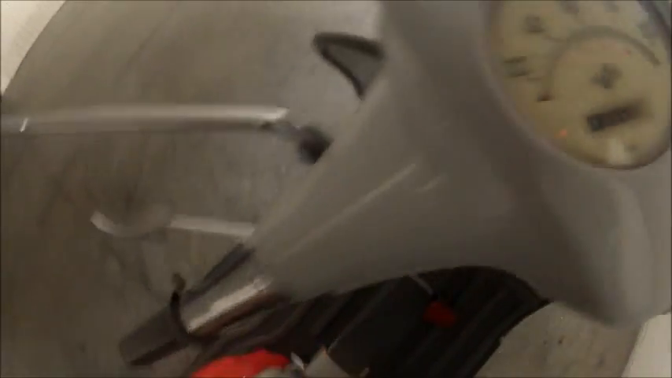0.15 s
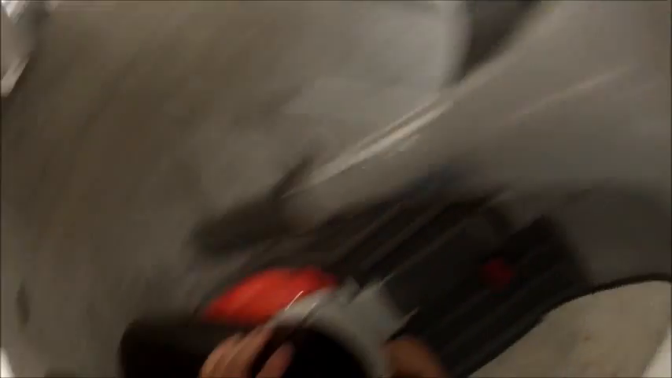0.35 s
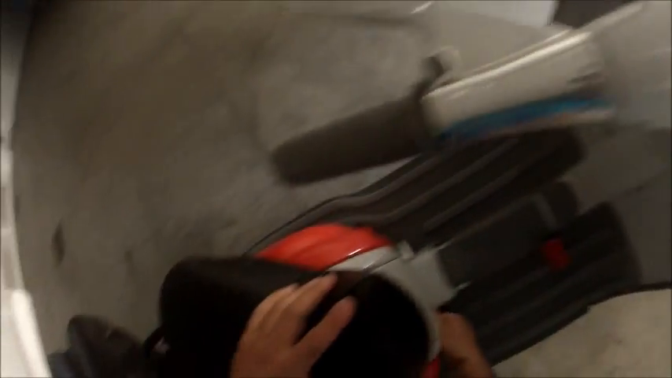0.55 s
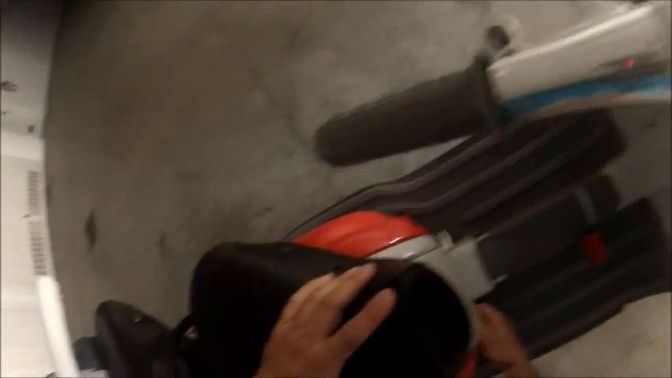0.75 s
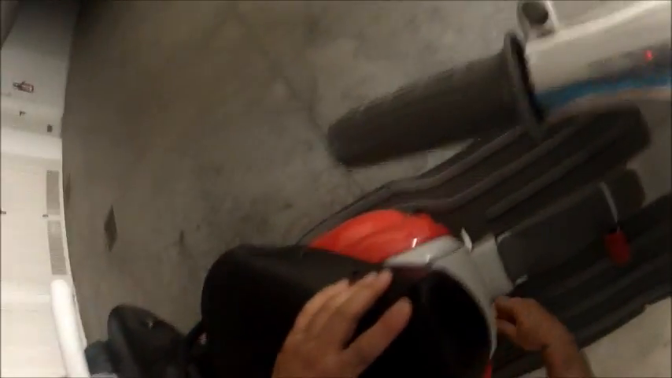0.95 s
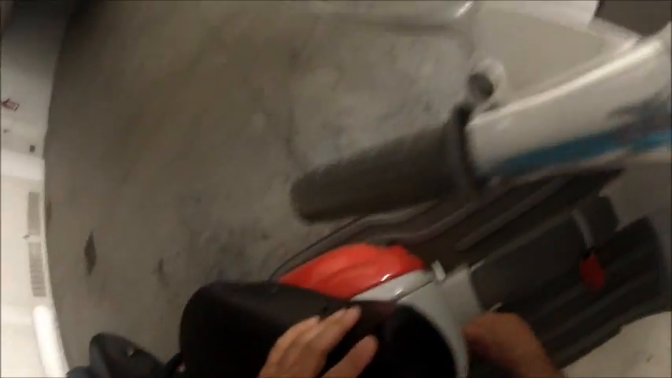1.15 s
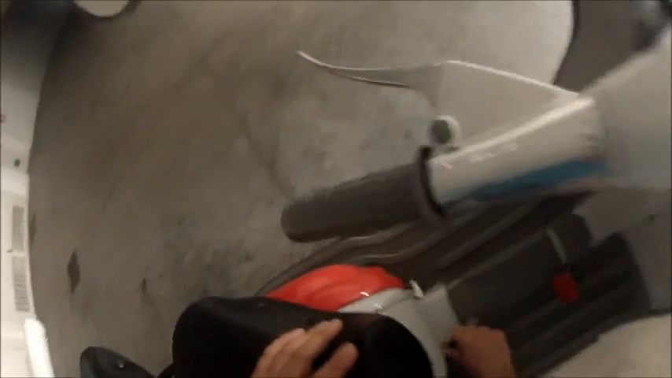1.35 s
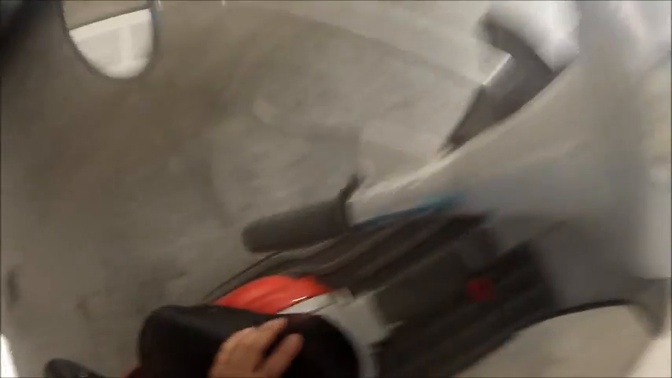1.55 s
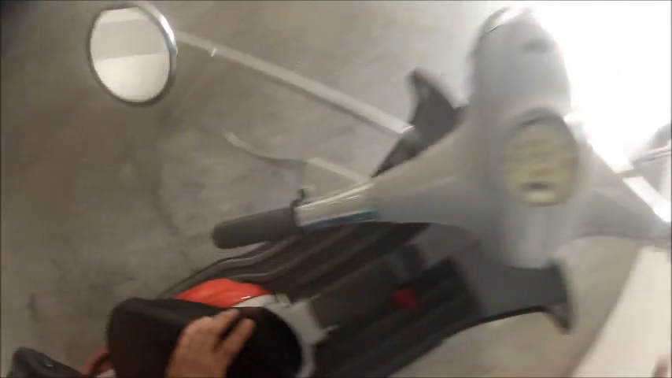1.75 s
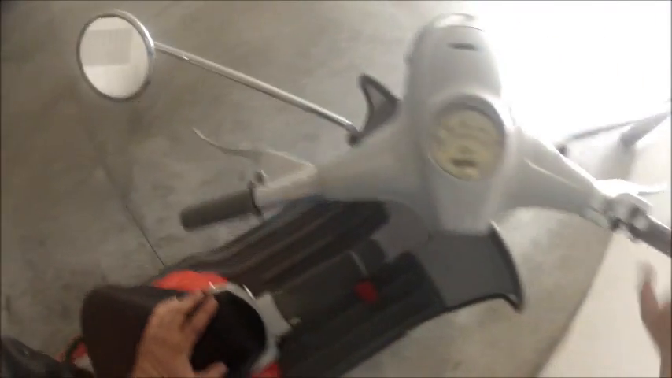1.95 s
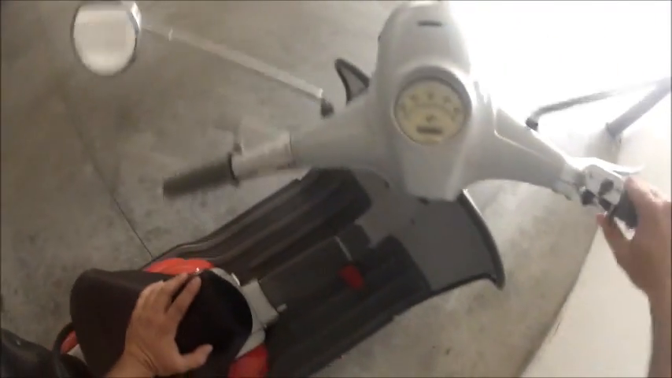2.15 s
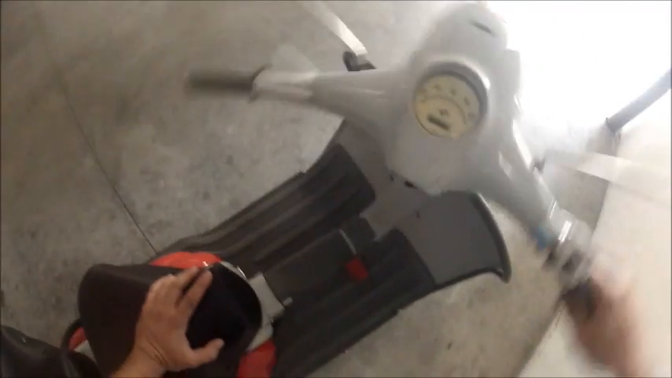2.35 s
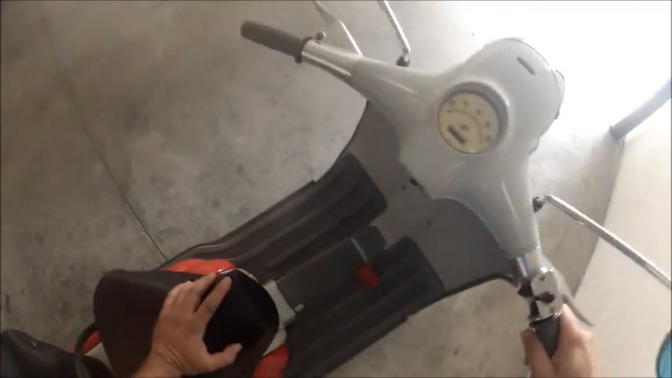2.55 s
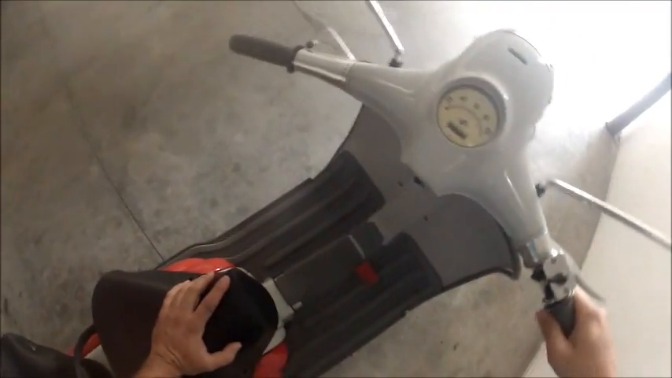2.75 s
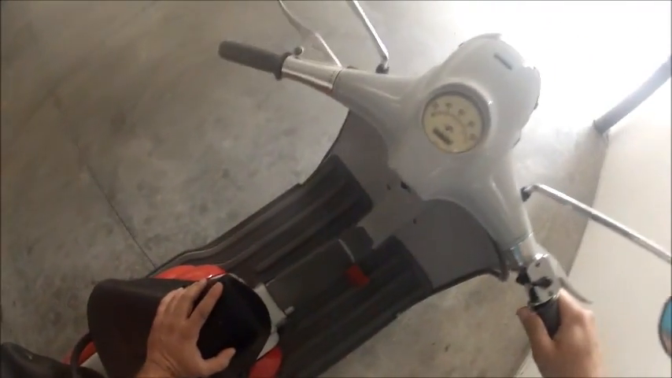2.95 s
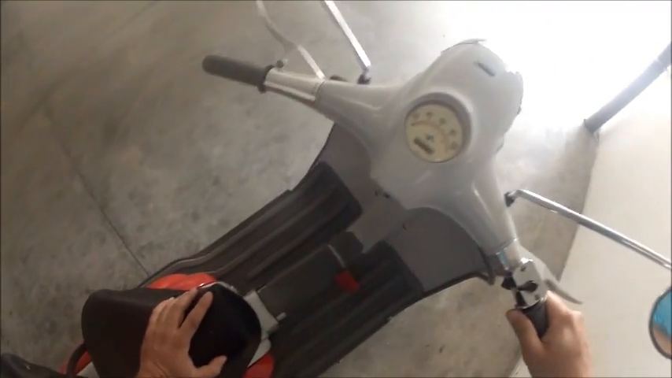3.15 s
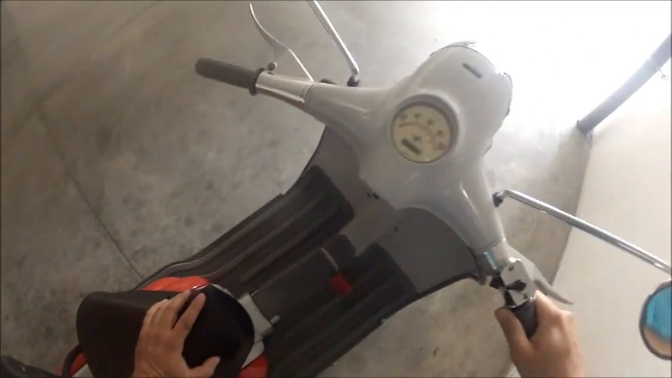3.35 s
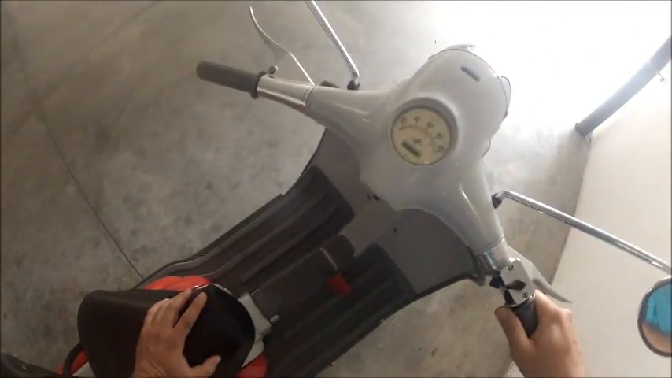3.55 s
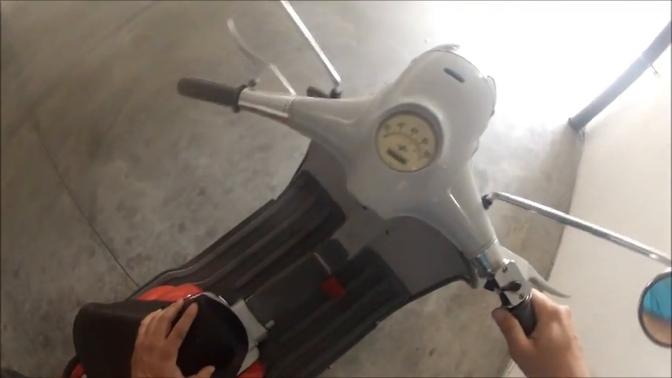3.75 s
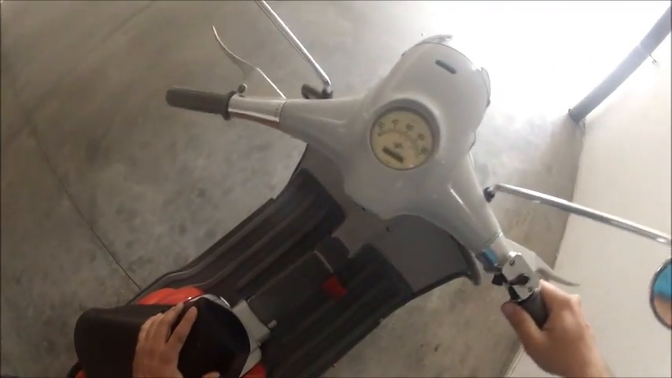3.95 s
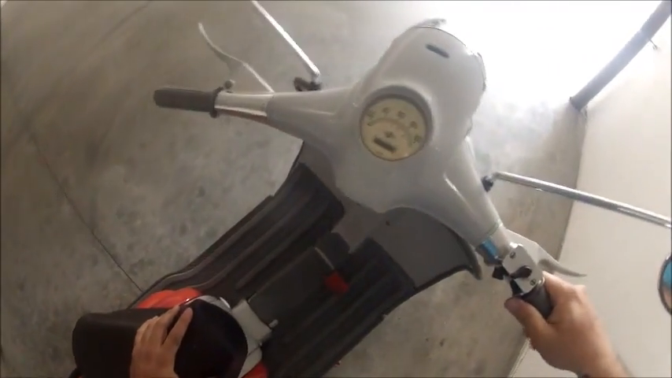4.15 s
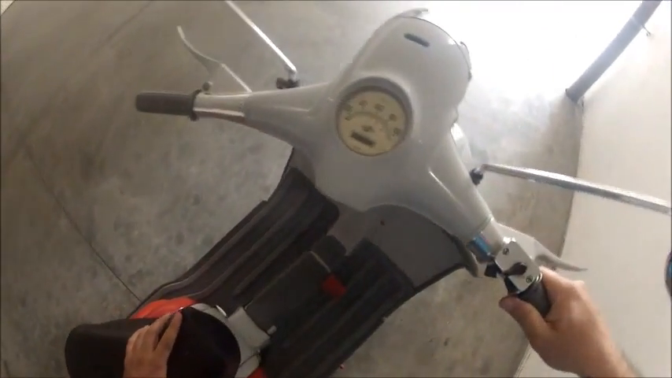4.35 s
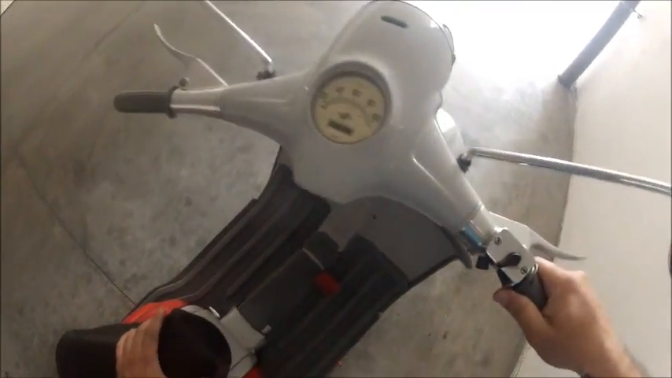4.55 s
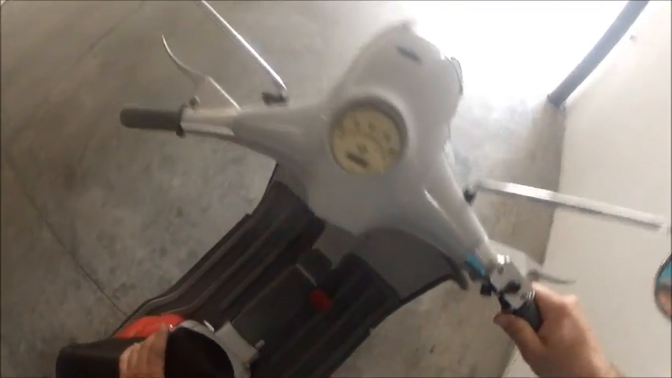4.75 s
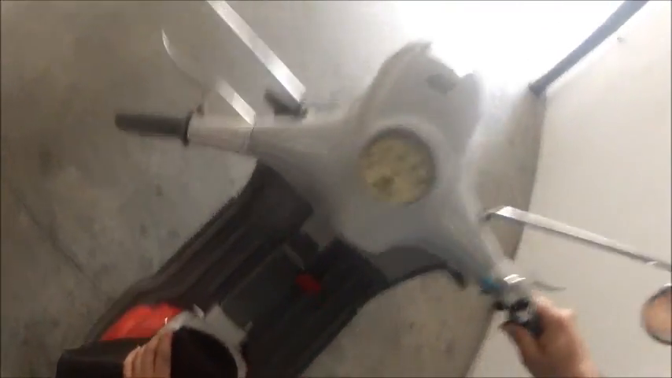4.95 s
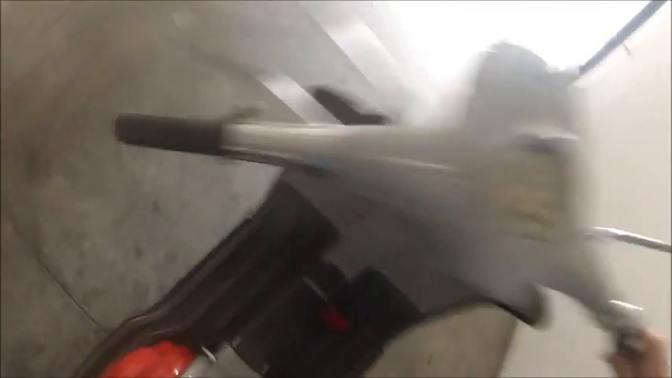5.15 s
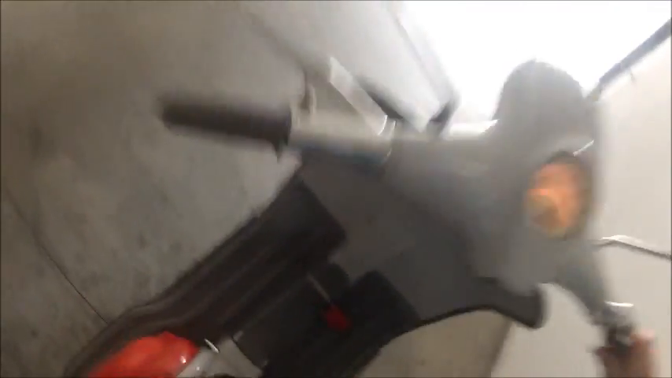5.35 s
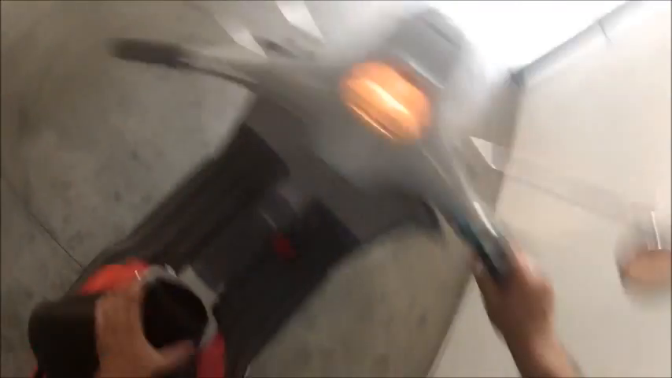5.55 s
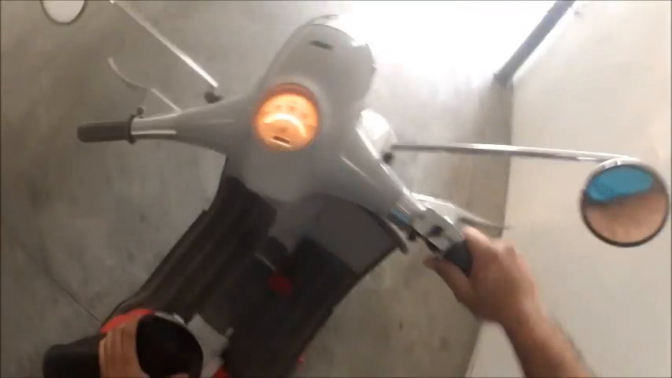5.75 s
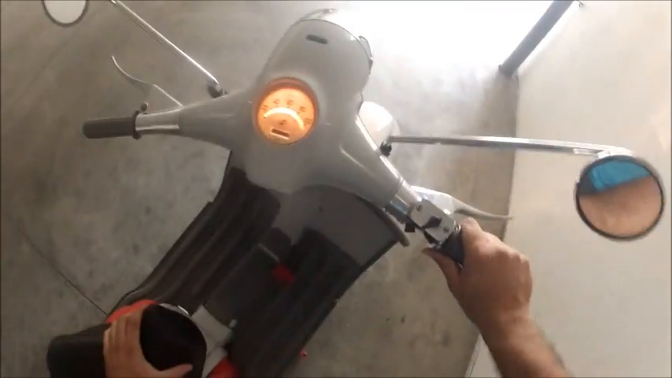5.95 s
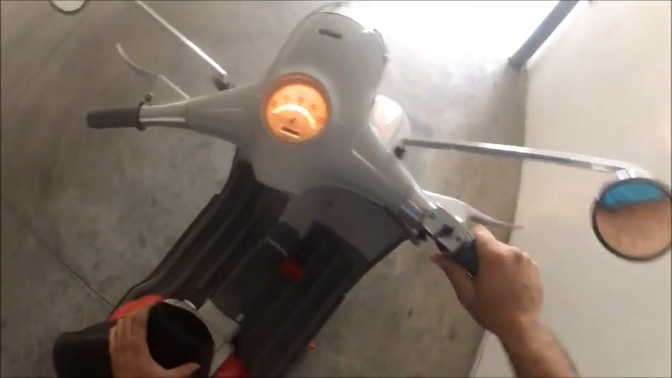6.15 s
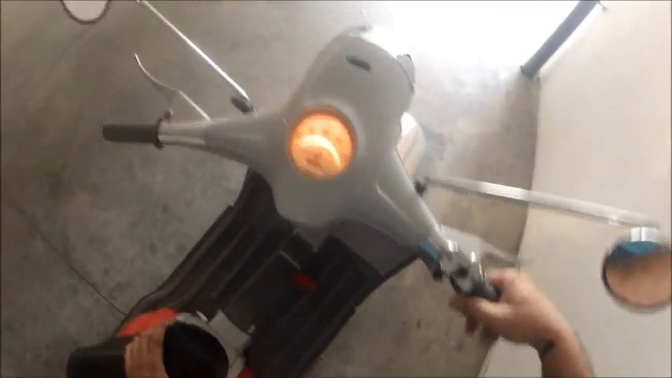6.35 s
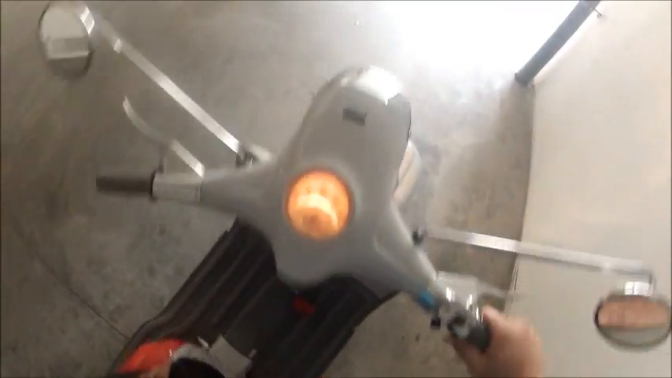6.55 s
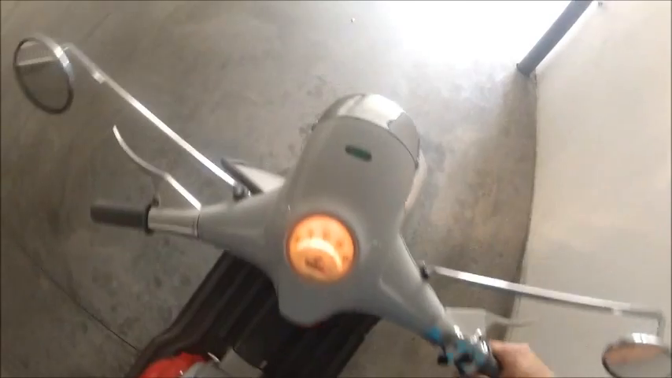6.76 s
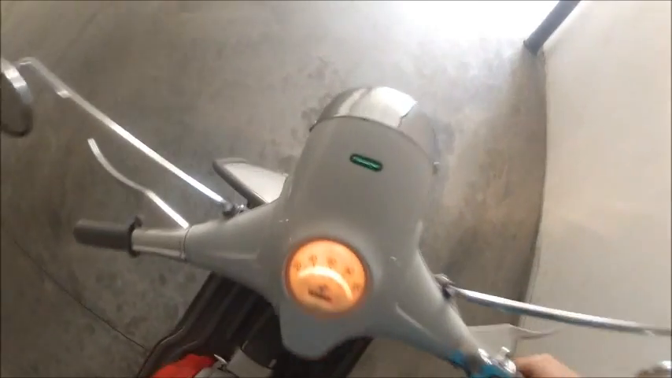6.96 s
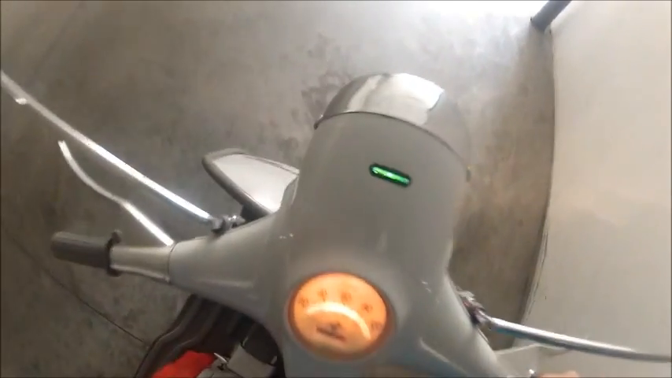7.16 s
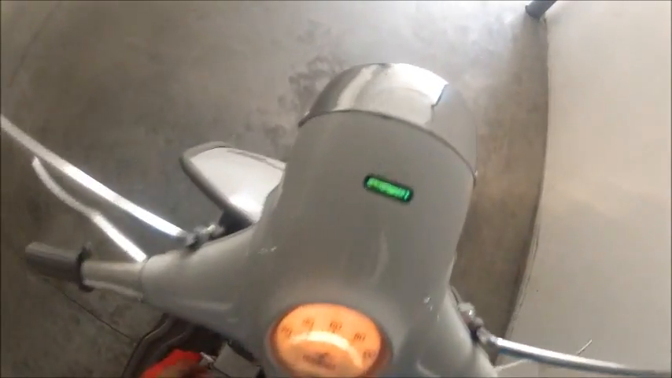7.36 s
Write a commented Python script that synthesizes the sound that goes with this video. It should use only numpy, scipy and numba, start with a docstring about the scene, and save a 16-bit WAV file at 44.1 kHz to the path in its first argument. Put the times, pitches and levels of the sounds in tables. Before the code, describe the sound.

A quiet concrete garage is heard from a helmet-mounted microphone, with faint room tone and a low rumble of head movement. Tiny plastic ticks and soft cloth rustle fill the first second. A scooter's levers knock lightly at about 0.3, 1.3, 1.8, 2.6 and 3.5 seconds, some with a brief metallic ring. A very faint, thin squeak follows near 4.4 seconds. From 5 to 5.7 seconds, sharp, dry plastic clicks clatter right at the microphone, loudest around 5.3, joined by rustling and low thumps. At 5.5 seconds a kick-start ratchet rasps briefly and the small engine catches. It runs at a wavering speed with a whirring fan, low hum and booming exhaust. Irregular firing cracks echo off the walls from 5.8 to 6.7 seconds, with another at 7.1. The engine speeds up slightly near 6.9 and is still running at the end, around 7.4 seconds.

```python
"""First a low rumble and small ticks, right at the microphone: a helmet camera in a plastic housing,
moving with the head in a quiet concrete garage. Close by, cloth rustles and a scooter's levers knock.
After five seconds it is kicked into life: a ratchet rasps, the fan whirrs, the exhaust booms in the
room and uneven firings crack off the walls. The camera samples at a low rate and holds each value,
which mirrors the sound into the treble."""
import sys
import numpy as np
from scipy import signal
from scipy.io import wavfile
from scipy.ndimage import uniform_filter1d
from numba import njit

SR = 44100
rng = np.random.default_rng(int(sys.argv[2]) if len(sys.argv) > 2 else 0)


def int16_out(signal):
    """Quantize to a 16-bit WAV file."""
    q = np.round(np.clip(np.atleast_2d(signal).T, -1, 1) * 32767)
    wavfile.write(sys.argv[1], SR, q.astype(np.int16))


N = 326781
T = np.arange(N) / SR

# head movement reaching the microphone (time [s], sway [dB], thud [dB])
HEAD_MOTION = [(0, -58, -68), (.52, -52, -62), (.84, -61.5, -72.5), (1.19, -58, -74.5), (1.63, -64.5, -70),
               (2.15, -57, -69.5), (2.56, -51.5, -69), (3.2, -63.5, -76), (3.6, -58.5, -74.5),
               (4.66, -52, -70.5), (5.24, -42, -51.5), (5.61, -43.5, -42), (5.88, -62, -56),
               (6.2, -45.5, -70), (6.5, -58, -59), (7.41, -53, -61)]
# bumps of the mount (time [s], sway [dB], thud [dB], decay [s])
MOUNT_BUMPS = [(.36, -51, -35.5, 0.012), (.43, -44, -49, 0.056), (0.871, -57, -42, 0.025),
               (1.31, -54, -65, .04), (1.46, -46, -59, 0.04), (1.539, -41, -70, 0.047),
               (1.79, -55, -65, 0.038), (1.94, -48, -85, 0.021), (2.07, -51, -64, 0.027),
               (2.4, -55, -74, 0.07), (2.89, -60, -62.5, 0.018), (4.19, -54.5, -70.5, 0.075),
               (4.42, -53, -60, 0.036), (4.58, -60, -82, 0.018), (4.75, -45, -63, 0.033),
               (4.98, -55, -46, 0.046), (5.14, -51, -40, 0.017), (5.279, -60, -37, 0.039),
               (5.499, -27.5, -38, 0.025), (5.68, -21.5, -33, .03), (5.73, -33, -45, 0.034)]
# room tone of the garage (frequency [Hz], relative band level [dB])
ROOM_BANDS = [(100, -16), (200, -11), (400, -17), (800, -31), (1400, -29.5), (2000, -26), (2700, -35),
              (4500, -33), (6000, -40)]
# cloth next to the housing (time [s], level [dB])
CLOTH_LEVELS = [(0.0, -81), (0.6, -74.5), (1.0, -86.5), (1.33, -81), (1.5, -74.5), (2.74, -78.5),
                (3.3, -87), (4.38, -71.5), (4.9, -82.5), (5.35, -61), (5.5, -41.5)]
# levers, stand and shoes; bands and ring are relative to the mid band, echo send to the peak
# (time [s], peak [dB], low band [dB], high band [dB], pitch [Hz], length [s], ring [dB], echo send [dB])
LEVER_KNOCKS = [(0.347, -51, -17, -20, 1190, 0.024, -30, -16.5),
                (1.282, -44.5, 1.5, -19, 846, 0.015, -15, -21),
                (1.816, -45.5, -39, -4.5, 1360, 0.048, -5.5, -24),
                (2.606, -51, 1, -10.5, 900, 0.021, -19, -12), (2.62, -49, 1, -20, 635, 0.013, -15, -13.5),
                (2.7, -49, -7, -15, 1210, 0.025, -16, -16), (3.52, -41, -4.5, -5.5, 663, 0.026, -0.5, -17),
                (3.7, -49.5, -5, -14, 954, 0.037, -8, -16.5), (5.057, -51, -6, -23, 1200, 0.029, -28, -23),
                (5.185, -53, 2, -19, 1280, 0.025, -25, -23), (5.409, -31, -24, -11, 1240, 0.017, 1, -30)]
# scooter panels and fan cowl (frequency [Hz], width [Hz], gain [dB])
BODY_MODES = [(686, 81, 3), (927, 77, 3.5), (1190, 183, 1), (1818.5, 197, 4), (2121, 263, 2),
              (2461, 238, -1.5), (3040, 280, -9.5), (3480, 350, -5.5), (4090, 1740, -12), (5770, 750, -14)]
# ringing metal lever (frequency [Hz], width [Hz], gain [dB])
LEVER_MODES = [(680, 48, -5), (1760, 87, -1), (2156, 130, 8), (3160, 51, 7), (3400, 72, 1.5),
               (3950, 42, -9)]
# housing struck or creaking (time [s], peak [dB], mode under the spot struck [Hz], low mode gain [dB],
# high mode gain [dB], thump over mid modes [dB], time for the blow to fall 60 dB [s])
HOUSING_TICKS = [(0.384, -52, 2350, -14, -15, -20, 0.034), (0.449, -52.5, 2360, -17, -19, -23, 0.041),
                 (0.487, -56, 2530, -25, -3, -25, 0.015), (0.573, -57, 1600, -15, -24, -20, 0.0165),
                 (0.655, -51, 1680, -12.5, -26, -23, 0.02), (0.738, -63, 1860, -22, -12, -20, 0.016),
                 (0.784, -49, 1730, -15, -29, -16, 0.0121), (0.833, -51, 2010, -8, -28, -20, 0.0093),
                 (0.857, -53, 1940, -22, -29, -20, 0.02), (2.053, -51.5, 2620, -30, -23, -22.5, 0.017),
                 (2.434, -60, 1870, -19, -17, -20, 0.025), (4.973, -21.5, 2137, -20, -25, -8.5, 0.022),
                 (4.998, -45, 2110, -16, -27, -20, 0.015), (5.085, -18.5, 2310, -15.5, -24, -1.5, 0.016),
                 (5.145, -27.5, 2144, -9.5, -40, 1.5, 0.016), (5.178, -49, 1800, -4, -4, -20, 0.026),
                 (5.227, -45, 1790, 0, -25, -20, 0.017), (5.268, -31.5, 1930, -17, -21, -21, 0.041),
                 (5.287, -17.5, 1870, -12.5, -16.5, -0.5, 0.029),
                 (5.325, -27.5, 1830, -16, -13, -11, 0.021), (5.338, -27, 1960, -11, -11, -22, 0.012),
                 (5.346, -5.5, 2030, -24, -11.5, -18.5, 0.011), (5.359, -20, 2070, -18, -11, -18, 0.011),
                 (5.429, -13, 1950, -12.5, -12, -4, 0.0097), (5.481, -12, 2280, -5, -17, -7, 0.013),
                 (5.534, -15, 2080, -11.5, -24, -16, 0.0084), (5.578, -34, 2070, 4, -13, -20, 0.015),
                 (5.604, -18.5, 2120, -8, -29, -20, 0.015), (5.643, -20.5, 2080, -9, -18, -20, 0.021)]
# plastic shell around the microphone (frequency [Hz], width [Hz], gain [dB])
HOUSING_MODES = [(458, 86, 10), (775, 180, 3), (1012, 140, 13), (1292, 140, 11.5), (1790, 210, 4),
                 (2056, 270, 5.5), (2232, 254, 4.5), (2465, 150, 5.5), (2980, 174, 16.5), (3670, 223, 17.5),
                 (5450, 2200, -7)]
# thin squeak (start [s], end [s], first level [dB], last level [dB])
SQUEAK_SPAN = (4.27, 4.5, -77, -71)
# engine starting (time [s], shaft rate [Hz], exhaust [dB], whirr [dB], panel rattle over whirr [dB])
ENGINE_RUN = [(5.4, 47.0, -48, -64.5, 5), (5.44, 47, -43, -58, 11), (5.51, 51.5, -44, -44, 1),
              (5.6, 57, -43, -43.5, -5.5), (5.66, 61.5, -39.5, -33.5, -5), (5.82, 51, -42.5, -41.5, -7.5),
              (5.96, 47.5, -42.5, -44, -10), (6.1, 35, -37, -46, -2), (6.18, 43, -36, -39.5, -5),
              (6.32, 57, -37.5, -36.5, -6.5), (6.4, 62.7, -42.5, -40, -14), (6.58, 42.2, -45, -41, -14),
              (6.69, 53, -40, -40.5, -7), (6.72, 58, -33, -35, -2.5), (6.82, 67, -31.5, -32.5, -3),
              (6.9, 81.4, -39.5, -34.5, -4), (7.16, 70.4, -43, -35, -10), (7.3, 71, -42.5, -38, -6.5),
              (7.41, 59, -48.5, -37, -8.5)]
# air modes of the garage (frequency [Hz], width [Hz], gain [dB])
GARAGE_MODES = [(73, 29, -36), (134, 46, -11.5), (189, 10.8, 0.5), (239.1, 5.6, 3), (271, 12.2, 2),
                (297.7, 9.1, -1), (316, 28, -2.5), (355.2, 7.5, 1), (424, 34, -3.5)]
# exhaust note at 1 to 6 times the shaft rate (amplitude over the boom [dB])
EXHAUST_HARMONICS = [-17.5, -21, -11, -12, -10, -31]
# kick-start ratchet (start [s], end [s], first level [dB], last level [dB])
RATCHET_SPAN = (5.47, 5.66, -50, -49)
# hum under the engine (time [s], lower tone [dB], upper tone [dB])
HUM_LEVELS = [(5.55, -69, -65), (5.622, -43, -45), (5.714, -48, -53), (5.792, -44, -37.5),
              (6.036, -49, -56), (6.108, -60, -38.5), (6.254, -45, -31.5), (6.446, -49.5, -49),
              (6.632, -46, -61), (6.82, -36, -37), (6.949, -49, -38), (7.026, -37.5, -46.5),
              (7.166, -36, -42), (7.23, -43.5, -51), (7.336, -40, -50), (7.41, -45, -64)]
# the charge firing hard (time [s], peak [dB])
HARD_FIRINGS = [(5.833, -29), (5.933, -28), (6.049, -26), (6.151, -24), (6.202, -26), (6.243, -25),
                (6.283, -23), (6.334, -24), (6.46, -25), (6.592, -24), (6.712, -24.5), (7.104, -24)]

LOW, MID, HIGH = (0, 1500), (1500, 2800), (2800, 9999)  # band edges [Hz]


def undb(db):
    return 10 ** (np.asarray(db) / 20)


def unit(x):
    return x / np.sqrt(np.mean(x ** 2))


def noise():
    return rng.standard_normal(N)


def curves(table):
    """Each column over time; -120 outside the table."""
    times, *columns = np.transpose(table)
    return [np.interp(T, times, column, left=-120, right=-120) for column in columns]


def span_db(start, end, first_db, last_db, fade_db_per_s=250):
    """A level that fades in, holds along a slope and fades out."""
    outside_s = np.maximum(np.maximum(start - T, T - end), 0)
    return np.interp(T, [start, end], [first_db, last_db]) - fade_db_per_s * outside_s


def walk(rate):
    """Random levels held 1 / rate s and smoothed twice; spread near 1."""
    hold = int(SR / rate)
    steps = np.repeat(rng.standard_normal(N // hold + 1), hold)
    return 1.324 * uniform_filter1d(uniform_filter1d(steps, hold), hold)[:N]


def band_noise(lo_hz, hi_hz):
    """Noise between two sharp edges."""
    return unit(signal.sosfilt(signal.butter(3, [lo_hz, hi_hz], "band", fs=SR, output="sos"), noise()))


@njit
def resonate(x, hz, width):
    """State-variable band-pass, gain 1 at the centre."""
    out, band_state, low_state = np.empty(len(x)), 0., 0.
    g, damping = np.tan(np.pi * hz / SR), width / hz
    for i in range(len(x)):
        band = (band_state + g * (x[i] + 1e-18 - low_state)) / (1 + g * (g + damping))
        band_state = 2 * band - band_state
        low_state += 2 * g * band
        out[i] = damping * band
    return out


def ring(x, modes, lo_hz=0, hi_hz=9999):
    """The modes between two frequencies, neighbours in opposite phase."""
    return sum((-1) ** k * undb(db) * resonate(x, float(hz), float(width))
               for k, (hz, width, db) in enumerate(modes) if lo_hz <= hz < hi_hz)


def add(track, start, burst, peak_db):
    """Lay a burst on the track with the given peak."""
    i = int(start * SR)
    track[i:i + len(burst)] += (undb(peak_db) * burst / np.max(np.abs(burst)))[:N - i]


def mount_rumble(rise_s=0.012):
    """Head sway and thuds reach the capsule through the mount; each bump swells quickly and dies away."""
    sway_db, thud_db = curves(HEAD_MOTION)
    sway = undb(sway_db + walk(9))
    thud = undb(thud_db + 4 * walk(9))
    for time, bump_sway_db, bump_thud_db, decay in MOUNT_BUMPS:
        bump = np.exp(np.minimum((T - time) / rise_s, (time - T) / decay))
        sway += undb(bump_sway_db) * bump
        thud += undb(bump_thud_db) * bump
    return sway * band_noise(21.0, 52.7) + thud * band_noise(70.6, 154.0)


def room_tone(level_db=-69):
    """The still garage and the camera's own hiss, each half-octave band drifting a little."""
    hz, db = np.transpose(ROOM_BANDS)
    centres = 100 * 2 ** np.arange(0, 6, .5)
    levels = np.interp(np.log(centres), np.log(hz), db)
    bands = (undb(band_db + 2.45 * walk(6.1)) * resonate(noise(), centre, centre / 3)
             for centre, band_db in zip(centres, levels))
    return undb(level_db) * unit(sum(bands))


def cloth():
    """Cloth rustles in bright grains right beside the housing."""
    grains = noise() * undb(2.0 * walk(60))
    return undb(curves(CLOTH_LEVELS)[0]) * unit(ring(grains, BODY_MODES, lo_hz=1500))


def lever_knocks():
    """Metal and rubber scrape briefly and leave a lever ringing; returns direct sound and echo send."""
    direct, to_walls, t = np.zeros(N), np.zeros(N), T[:20000]
    for time, peak_db, low_db, high_db, pitch_hz, length, ring_db, echo_db in LEVER_KNOCKS:
        hold_and_decay = np.exp(-np.maximum(t - length / 2, 0) / (length / 2))
        scrape = rng.standard_normal(len(t)) * hold_and_decay * (1 - np.exp(-t / 0.0011))
        low, mid, high = (unit(ring(scrape, BODY_MODES, *band)) for band in (LOW, MID, HIGH))
        body = unit(low + 6.3 * unit(resonate(scrape, float(pitch_hz), 87.0)))
        metal = unit(ring(rng.standard_normal(len(t)) * np.exp(-t / .13), LEVER_MODES))
        knock = mid + undb(low_db) * body + undb(high_db) * high + undb(ring_db) * metal
        add(direct, time, knock, peak_db)
        add(to_walls, time, knock, peak_db + echo_db)
    return direct, to_walls


@njit
def garage_echo(x, lags, t60_s=1.11, damping=0.12):
    """Concrete walls: eight delay lines feed each other, duller on every round."""
    gain = 10 ** (-3 * lags / SR / t60_s)
    lines, dulled, out = np.zeros((8, 4096)), np.zeros(8), np.zeros(len(x))
    for i in range(len(x)):
        for k in range(8):
            dulled[k] += (1 - damping) * (gain[k] * lines[k, (i - lags[k]) & 4095] - dulled[k])
            out[i] += dulled[k] * (1 - 2 * (k % 2))
        crossfeed = dulled.sum() / 4
        for k in range(8):
            lines[k, i & 4095] = x[i] + 1e-18 + dulled[k] - crossfeed
    return out


def housing_ticks():
    """A scratchy blow rings the housing, favouring the mode under the spot struck; the mount thumps."""
    out, t = np.zeros(N), T[:4000]
    thump = unit(np.sin(2 * np.pi * 190 * t) * np.exp(-t / 0.0046))
    for time, peak_db, spot_hz, low_db, high_db, thump_db, t60 in HOUSING_TICKS:
        blow = rng.standard_normal(len(t)) * undb(-60 * t / t60) * (1 - np.exp(-t / 0.00038))
        blow[12] += 2.2  # the hard first contact
        struck = [(hz, width, db - 10 * min(abs(hz - spot_hz) / 400, 1))
                  for hz, width, db in HOUSING_MODES]
        low = undb(low_db) * ring(blow, HOUSING_MODES, *LOW)
        mid = ring(blow, struck, *MID)
        high = undb(high_db) * ring(blow, struck, *HIGH)
        add(out, time, low + mid + high + undb(thump_db) * np.std(mid) * thump, peak_db)
    return out


def squeak():
    """A faint, thin squeak: flickering noise in one narrow resonance."""
    flicker = noise() * undb(3 * walk(40))
    return undb(span_db(*SQUEAK_SPAN)) * unit(resonate(flicker, hz=1240., width=45.))


def engine():
    """The shaft turns with slight jitter, each turn of a different strength, driving exhaust and fan."""
    shaft_hz, exhaust_db, whirr_db, rattle_db = curves(ENGINE_RUN)
    turns = np.cumsum(np.maximum(shaft_hz, 0) * (1 + 0.00616 * walk(30))) / SR
    strength = undb(2.5 * rng.standard_normal(N // 100))[turns.astype(int)]
    boom = undb(exhaust_db) * exhaust(turns, strength)
    return boom + fan_whirr(turns, strength, shaft_hz, whirr_db, rattle_db)


def exhaust(turns, strength):
    """One pulse a turn, with noise, booms in the garage's air modes; shaft harmonics give the note."""
    pulses = strength * (np.diff(turns.astype(int), prepend=0) > 0)
    running = T > ENGINE_RUN[0][0]
    pulses = unit(pulses * running) * np.sqrt(np.mean(running))  # unit power while running
    boom = ring(pulses + 1.43 * noise(), GARAGE_MODES)
    note = sum(undb(db + 3.2 * walk(10)) * np.sin(2 * np.pi * order * turns)
               for order, db in enumerate(EXHAUST_HARMONICS, 1))
    return boom / np.std(boom[running]) + note


def fan_whirr(turns, strength, shaft_hz, whirr_db, rattle_db, catch_s=5.69, settle_s=.06):
    """Fan and gears throb once a turn and shake the panels; hiss and one panel's ring rise with speed."""
    throb = 1 + 0.39 * np.exp(-(turns % 1) / 0.53)
    rush = noise() * strength ** 0.2 * throb * undb(1.6 * walk(25))
    rattle, whirr, hiss = (unit(ring(rush, BODY_MODES, *band)) for band in (LOW, MID, HIGH))
    catch_db = 6.5 * np.exp(-np.maximum(T - catch_s, 0) / settle_s)  # extra hiss until it catches
    hiss_db = -10 + 0.0478 * (shaft_hz - 55) + catch_db
    panel = unit(resonate(rush, hz=1868.4, width=41.0))
    panel_db = -7 + 0.2526 * (shaft_hz - 56) + 3 * walk(14)
    colour = undb(rattle_db) * rattle + undb(hiss_db) * hiss + undb(panel_db) * panel
    return undb(whirr_db) * (whirr + colour)


def ratchet():
    """The kick-start ratchet rasps: rough noise in one high resonance."""
    rasp = noise() * undb(2.6 * walk(70))
    return undb(span_db(*RATCHET_SPAN)) * unit(resonate(rasp, hz=4420.0, width=90.0))


def hum(tones_hz=(143.2, 217.2), waver_hz=1.78):
    """Two low tones swell and sink under the engine, wandering a little in pitch."""
    phases = (2 * np.pi * np.cumsum(hz + waver_hz * walk(12)) / SR for hz in tones_hz)
    return sum(undb(db) * np.sqrt(2) * np.sin(phase) for phase, db in zip(phases, curves(HUM_LEVELS)))


def hard_firings():
    """The charge fires hard: a sharp crack rings the scooter's panels."""
    out, t = np.zeros(N), T[:4000]
    for time, peak_db in HARD_FIRINGS:
        crack = rng.standard_normal(len(t)) * np.exp(-t / 0.013) * (1 - np.exp(-t / 0.00044))
        bang = ring(crack, BODY_MODES, hi_hz=1500) + undb(-4.0) * ring(crack, BODY_MODES, lo_hz=1500)
        add(out, time, bang, peak_db)
    return out


def scene():
    """From the helmet: knocks and firings echo between the walls; what touches the housing stays dry."""
    scooter = engine() + hum() + ratchet()
    bangs = hard_firings()
    knocks, to_walls = lever_knocks()
    echo = garage_echo(to_walls + undb(-13.5) * bangs, lags=rng.integers(700, 2600, 8))
    at_microphone = housing_ticks() + cloth() + squeak() + mount_rumble()
    mono = scooter + bangs + knocks + echo + at_microphone + room_tone()
    return np.array([mono, mono])


def record(dry, top_hz=15350):
    """The camera samples at 12 kHz and holds each value, mirroring tones around 12 kHz; the top is cut."""
    sampled = signal.resample_poly(dry[0], 40, 147)  # down to 12 kHz
    held = signal.resample_poly(np.repeat(sampled, 12), 49, 160)[:N]  # stair steps, back at SR
    mono = signal.sosfilt(signal.ellip(10, .2, 70, top_hz, fs=SR, output="sos"), held)
    return np.array([mono, mono])


dry = scene()
out = record(dry)
int16_out(out)
```